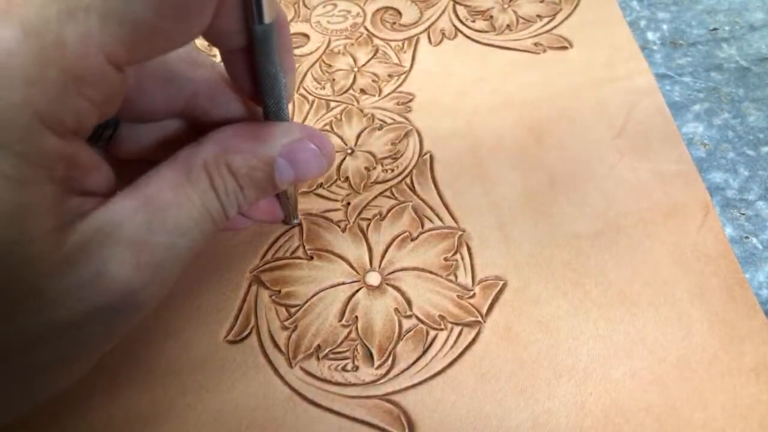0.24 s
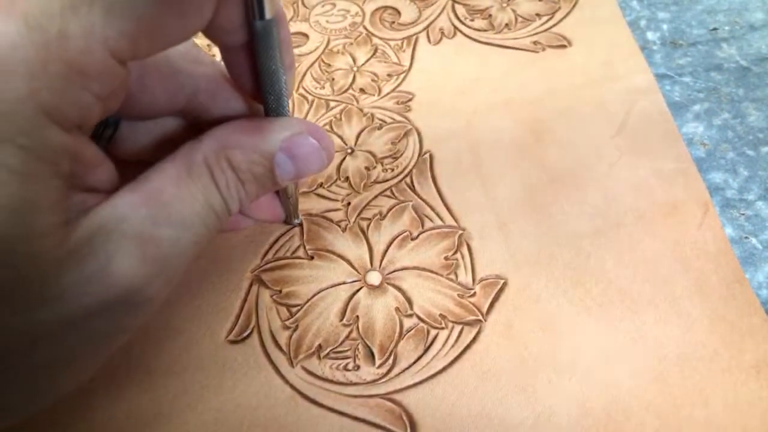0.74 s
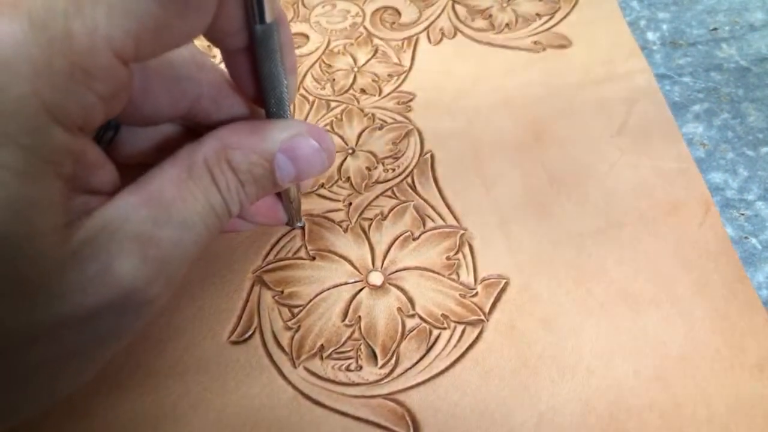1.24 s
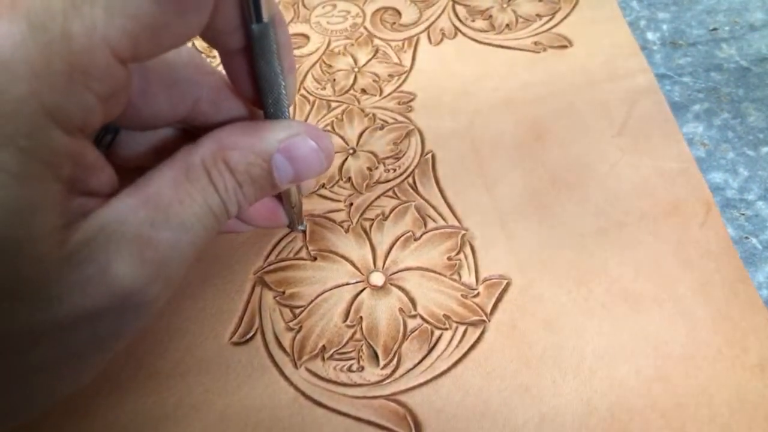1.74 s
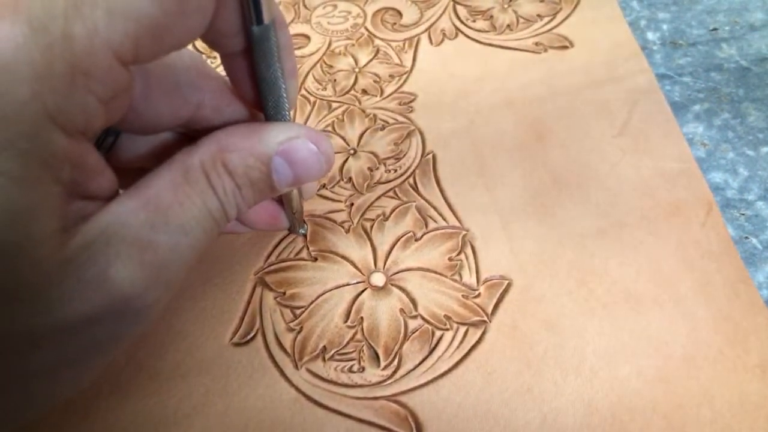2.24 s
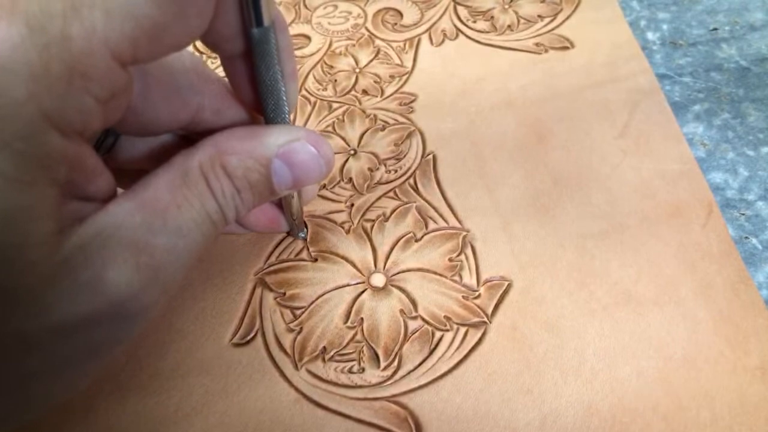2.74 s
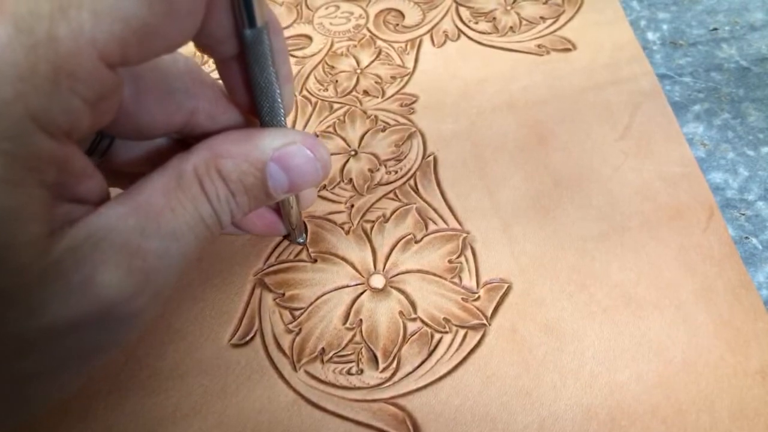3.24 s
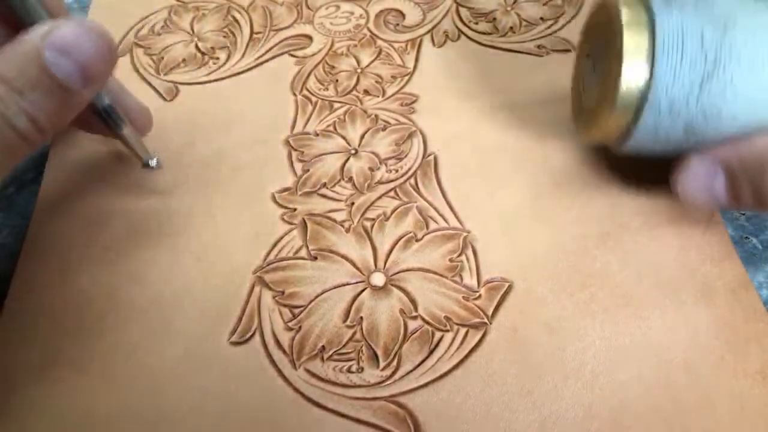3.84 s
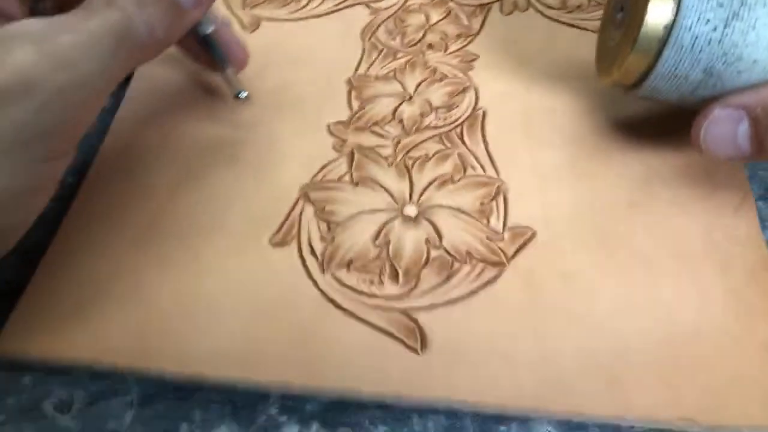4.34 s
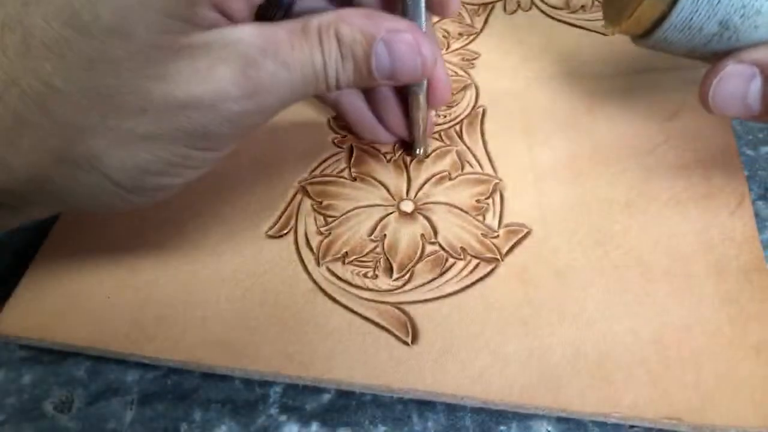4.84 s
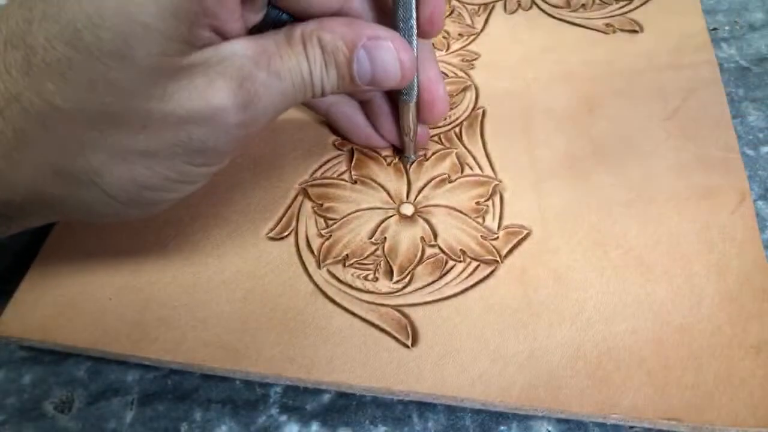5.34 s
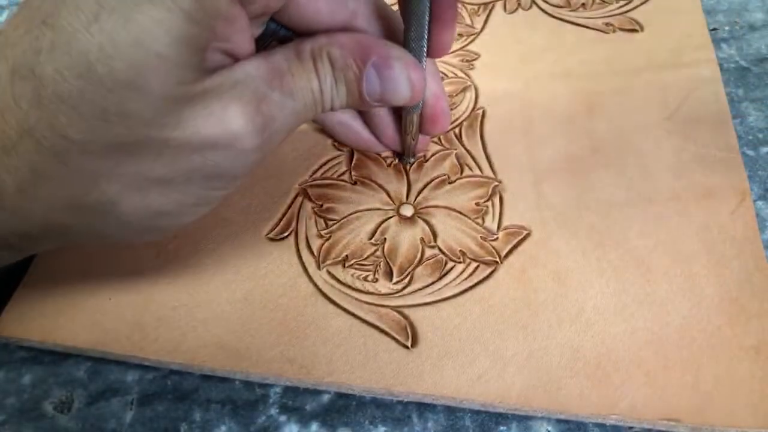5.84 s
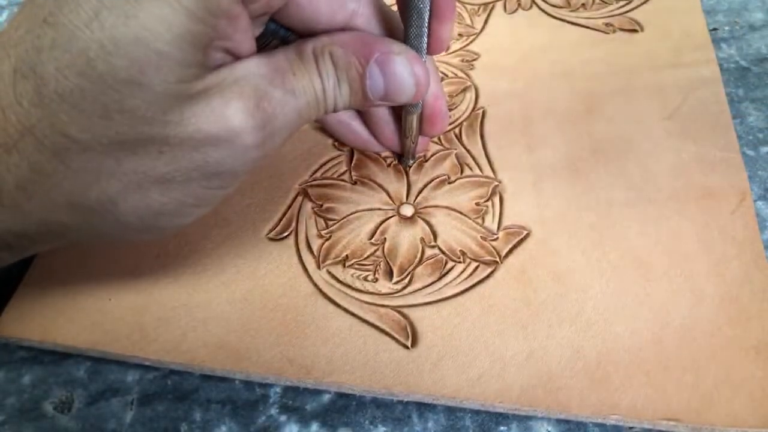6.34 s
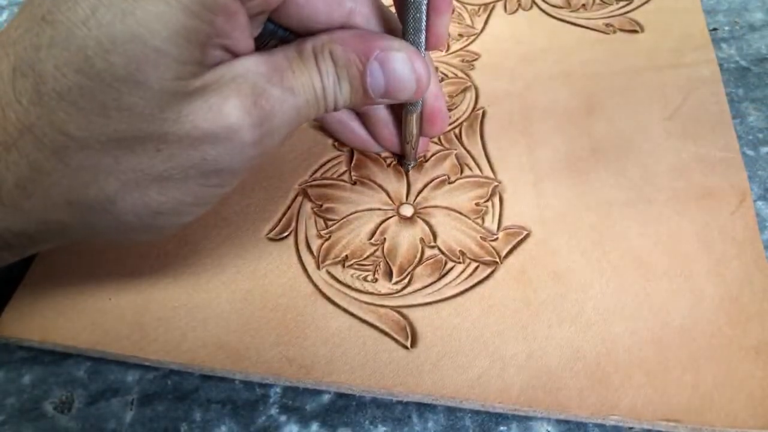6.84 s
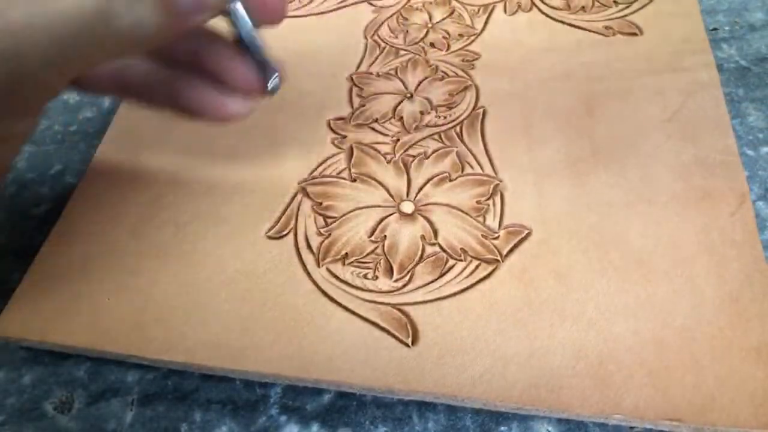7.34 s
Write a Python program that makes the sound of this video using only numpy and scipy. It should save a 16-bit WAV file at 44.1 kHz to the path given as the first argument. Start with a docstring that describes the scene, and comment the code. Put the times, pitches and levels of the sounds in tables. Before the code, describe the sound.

A mallet taps a steel stamp into leather on a stone slab in two quick runs, with faint handling between them.

```python
"""A mallet taps a steel stamp into leather on a stone slab, in two quick runs in a small workshop.
Each tap is a hard clack with a short clink of steel on top and a slab thud that sets the bench ringing.
Stronger blows sound brighter; the second run uses another stamp, with less knock and a deeper thud.
Between the runs tools touch down and a hand slides and turns the leather; one more slide ends the scene.
Under it all lies a faint bed of room air and motor hum."""
import sys
import numpy as np
from scipy import signal
from scipy.fft import rfft, irfft, next_fast_len
from scipy.io import wavfile

SR = 44100
rng = np.random.default_rng(int(sys.argv[2]) if len(sys.argv) > 2 else 0)


def persist_wave(psi):
    """Save psi, clipped to +-1, as 16-bit WAV."""
    counts = np.round(np.clip(psi, -1, 1) * 32767).astype(np.int16)
    wavfile.write(sys.argv[1], SR, np.atleast_2d(counts).T)


N = 334278
TIME = np.arange(N) / SR

# spectral shape of the room air: f/Hz, level/dB
AIR_COLOUR = [(15, -80), (25, -47), (53, -12.5), (84, -11.5), (117, -7), (180, -15), (229, -15),
              (263, -17.5), (285, -21.5), (405, -23), (451, -28.5), (624, -29.5), (2050, -41),
              (10700, -47.5), (16000, -50.5)]
# mallet taps: t/s, force/dB, hardness/dB, low and high bending pitch of the stamp f/Hz
TAPS = [(0.2281, -6.5, 0, 2094, 3840), (0.48, -1, 2, 2073, 3920), (0.7364, 1.5, 5, 2270, 4800),
        (1.0103, 0.5, -0.5, 2850, 4080), (1.255, 4, 1.5, 2450, 3200), (1.4877, 3, 2, 2670, 4800),
        (1.7144, 3, 2, 2544, 4900), (1.9436, 2, 0.5, 2617, 3600), (2.1647, 0.5, -3.5, 2290, 3760),
        (2.3837, -5.5, -6.5, 2216, 4020), (2.5776, -10.5, -9, 2245, 3700), (2.7726, -11.5, 0.5, 2053, 3940),
        (2.9572, -16.5, 0, 2084, 4100), (3.128, -23.5, 1.5, 2210, 3890), (3.2969, -24, 3, 2560, 3800),
        (5.7845, -6.5, -5.5, 1580, 4240), (6.0194, 1.5, 4, 2780, 4080), (6.2765, -3, 0.5, 2746, 4100),
        (6.509, -7, 0.5, 2334, 4330), (6.7034, -10.5, 1.5, 2154, 4050), (6.8928, -15.5, 0.5, 1914, 4300)]
# centres of a tap's five registers (thud, knock, clack, ring, snap): f/Hz
REGISTERS_HZ = [400, 1050, 2100, 4400, 8500]
# damped modes of mallet and hand-held stamp, grouped from knock to snap: f/Hz, width/Hz, level/dB
TOOL_MODES = [
    [(1057, 440, 1.5)],
    [(1851, 320, -3.5), (2364, 600, -4)],
    [(3050, 520, -4.5), (3778, 440, -3.5), (4760, 700, -9)],
    [(6325, 1300, -2.5), (8690, 1700, -5.5), (12500, 4500, -10)],
]
# lingering resonances of tools and slab, grouped likewise: f/Hz, width/Hz, level/dB, t60/s
AFTER_RING_MODES = [
    [(647.5, 21, -16.5, 0.26), (1200, 110, -15, 0.22)],
    [(1880, 140, -22.5, .2), (2250, 230, -18.5, 0.29)],
    [(3845, 380, -16, 0.23)],
    [(5440, 1400, -11, 0.22), (8600, 790, -20.5, 0.15)],
]
# spectral shape of the slab's thud: f/Hz, level/dB
THUD_COLOUR = [(40, -40.5), (70, -9), (110, -5), (190, -5), (310, -3), (490, -8), (600, -22), (900, -35),
               (2500, -91.5)]
# room reverb by half octave, relative to the tap: f/Hz, level/dB, t60/s
ROOM_TAIL = [(70, -19, 0.16), (171, -19.5, 0.58), (253.3, -11, 0.58), (340, -7, .45), (444, -13, 0.29),
             (690, -14.5, 0.25), (940, -14.5, 0.24), (1300, -16.5, 0.32), (2370, -16.3, 0.24),
             (3700, -13, 0.36), (5300, -19, 0.1), (8240, -17.5, .22), (15000, -27, 0.21)]
# modes of bench and slab: f/Hz, level/dB, t60/s
BENCH_MODES = [(74, -14.5, 0.46), (115, -19.5, 0.29), (157.5, -20.5, 0.55), (230, -25, 0.56),
               (246.4, -19.5, .42), (281.7, -20, .45), (299.6, -17, 0.57), (327, -15, .42), (368, -15, .45),
               (481, -16, 0.17)]
# early reflections of the thud: delay/s, level/dB
THUD_ECHOES = [(.0095, -14), (0.0181, -14)]
# light touches of the tools: t/s, level/dB
TOUCHES = [(3.445, -66), (3.745, -62.5), (3.963, -63.5), (4.389, -54), (4.956, -72)]
# spectral shape of a touch: f/Hz, level/dB
TOUCH_COLOUR = [(200, 16), (500, 11.5), (800, 1.5), (1250, 1.5), (1700, 2), (2600, -10), (5500, -14),
                (8500, -3.5), (15000, -30)]
# slides of hand and leather: full speed at t/s, hold/s, level/dB, scrape f/Hz
SLIDES = [(3.74, 0.028, -65.5, 1717), (4.175, 0.13, -67.5, 1722), (4.63, .11, -75, 1220),
          (7.27, .08, -67.5, 1220)]
# spectral shape of the rubbing: f/Hz, level/dB
SLIDE_COLOUR = [(300, 8), (750, 1), (1500, -0.5), (2000, -3.5), (3500, -6), (7000, -9), (10000, -14),
                (16000, -25)]
# resonances excited by the rubbing: f/Hz, width/Hz, level/dB
SLIDE_MODES = [(1220, 55, -17), (1720, 80, -18), (2390, 230, -17), (3440, 240, -14.5), (4470, 290, -14.5)]

# each stamp's voice at force and hardness 0: knock, clack, ring, snap level/dB
FIRST_STAMP, SECOND_STAMP = (-31, -28.5, -39, -49.5), (-44, -32, -36.5, -47.8)
STAMP_CHANGE_S = 4.5
# a stronger or harder blow is shorter and so brighter: knock, clack, ring, snap slope/(dB per dB)
PER_FORCE, PER_HARDNESS = (.24, .46, .61, .96), (.1, .36, 1, 1.15)


def from_db(db):
    """Decibels to gain."""
    return 10 ** (np.asarray(db) / 20)


def unit_rms(x):
    """Scale to rms 1."""
    return x / np.sqrt(np.mean(x ** 2) + 1e-20)


def unit_hit(x):
    """Scale a short sound to the energy of 10 ms at rms 1."""
    return x / np.sqrt(np.sum(x ** 2) / (SR / 100) + 1e-20)


def at_hz(table, hz, column=1):
    """Read a column of a table on a log-frequency axis."""
    table = np.array(table)
    return np.interp(np.log(hz), np.log(table[:, 0]), table[:, column])


def band(x, hz, width_hz, order=2):
    """A flat-topped resonance."""
    edges = np.clip([hz - width_hz / 2, hz + width_hz / 2], 10, .48 * SR)
    return signal.sosfilt(signal.butter(order, edges, "band", fs=SR, output="sos"), x + 1e-18)


def add(out, s, sound):
    """Mix a sound in at time s."""
    i = max(0, round(s * SR))
    out[i:i + len(sound)] += sound[:max(0, len(out) - i)]


def coloured_noise(colour):
    """Noise with a given spectral shape, rms 1."""
    size = next_fast_len(N)
    hz = np.maximum(np.fft.rfftfreq(size, 1 / SR), 1)
    spectrum = rfft(rng.standard_normal(size)) * from_db(at_hz(colour, hz))
    return unit_rms(irfft(spectrum, size)[:N])


def band_noise(hz, width_hz, order=2):
    """Noise in one band, rms 1."""
    return unit_rms(band(rng.standard_normal(N), hz, width_hz, order))


def drift(per_s):
    """A random wobble, rms 1."""
    knots = np.arange(0, N / SR + 1, 1 / per_s)
    return unit_rms(np.interp(TIME, knots, rng.standard_normal(len(knots))))


def lingering(hz, width_hz, t60):
    """A resonance carried on by the room: a grainy, dying ring."""
    t = TIME[:SR // 3]
    settled = band(rng.standard_normal(2 * len(t)), hz, width_hz)[len(t):]
    return unit_hit(settled * from_db(-60 * t / t60))


def room_tone(air_db=-63.5, hum_hz=119.2, hum_db=-72, waver_db=3):
    """The bed: low air noise and a wavering motor hum."""
    hum = np.sqrt(2) * np.sin(2 * np.pi * hum_hz * TIME) * from_db(hum_db + waver_db * drift(7))
    return from_db(air_db) * coloured_noise(AIR_COLOUR) + hum


def strikes(base_thud_db=-30, base_send_db=-.5, send_per_force=.07):
    """Cue each tap: t/s, thud level/dB, knock-to-snap levels/dB, clink pitches/Hz, room send/dB."""
    for s, force_db, hardness_db, *clink_hz in TAPS:
        voice_db = np.array(FIRST_STAMP if s < STAMP_CHANGE_S else SECOND_STAMP)
        tool_db = voice_db + force_db * np.array(PER_FORCE) + hardness_db * np.array(PER_HARDNESS)
        send_db = base_send_db + send_per_force * force_db   # strong blows fill the room more
        yield s, base_thud_db + force_db, tool_db, clink_hz, send_db


def steel_clink(db=-5, t60=0.028, rise_s=0.00033, lead_s=0.0022, tail_db=-16):
    """The grip lets two bending modes of the steel sing briefly; their pitches linger faintly."""
    out, t = np.zeros(N), TIME[:SR // 20]
    envelope = (1 - np.exp(-t / rise_s)) ** 2 * from_db(-60 * t / t60)
    for s, _, tool_db, clink_hz, send_db in strikes():
        for hz in clink_hz:
            register_db = np.interp(np.log(hz), np.log(REGISTERS_HZ[1:]), tool_db)
            ping = unit_hit(envelope * np.sin(2 * np.pi * hz * t))
            add(out, s - lead_s, from_db(register_db + db) * ping)
            tail = lingering(hz, width_hz=160, t60=0.19)
            add(out, s, from_db(register_db + send_db + tail_db) * tail)
    return out


def mallet_clack(contact_s=0.00084, chatter_hz=2200, grip_detune=0.039, spread_db=1.5, lag_s=0.00018):
    """The mallet lands and chatters on the steel, most in the treble; the grip detunes each tap."""
    out, t = np.zeros(N), TIME[:SR // 25]
    impact = len(t) // 5
    landing = unit_hit(signal.unit_impulse(len(t), impact))
    pressure = 1 / np.cosh((t - t[impact]) / contact_s)
    for s, _, tool_db, _, _ in strikes():
        for modes, register_db in zip(TOOL_MODES, tool_db):
            for hz, width_hz, mode_db in modes:
                chatter = (hz / chatter_hz) ** 2 * unit_hit(pressure * rng.standard_normal(len(t)))
                gripped_hz = hz * (1 + grip_detune * rng.uniform(-1, 1))
                ringing = unit_hit(band(landing + chatter, gripped_hz, width_hz, order=3))
                crest_s = np.average(t, weights=ringing ** 2)   # all modes crest together
                gain = from_db(register_db + mode_db + spread_db * rng.normal())
                add(out, s + lag_s - crest_s, gain * ringing)
    return out


def after_ring(spread_db=1.5):
    """Tools and slab leave a faint, diffuse ring, a little different every time."""
    out = np.zeros(N)
    for s, _, tool_db, _, send_db in strikes():
        for modes, register_db in zip(AFTER_RING_MODES, tool_db):
            for hz, width_hz, mode_db, t60 in modes:
                gain = from_db(register_db + send_db + mode_db + spread_db * rng.normal())
                add(out, s, gain * lingering(hz, width_hz, t60))
    return out


def slab_thud(late_cycles=1.15, lag_s=.0002, second_pitch=0.89):
    """The leather cushions the blow; the slab thuds with its lows arriving last, so the pitch falls."""
    out = np.zeros(N)
    hz = np.maximum(np.fft.rfftfreq(8192, 1 / SR), 1)
    down_sweep = np.exp(-2j * np.pi * late_cycles * np.log(hz))
    for s, thud_db, *_ in strikes():
        pitch = 1 if s < STAMP_CHANGE_S else second_pitch   # the second stamp sinks in more slowly
        thud = irfft(from_db(at_hz(THUD_COLOUR, hz / pitch)) * down_sweep)
        add(out, s + lag_s, from_db(thud_db) * unit_hit(thud[:SR // 10]))
    return out


def workshop_reverb(build_s=0.0011, near_db=3, near_t60=0.12):
    """Each tap washes into the room: quick returns off hands and bench, then a tail dying band by band."""
    out, t = np.zeros(N), TIME[:SR * 2 // 3]
    near = from_db(near_db - 60 * t / near_t60)
    edges_hz = 50 * 2 ** (np.arange(18) / 2)   # half octaves
    for low, high in zip(edges_hz, edges_hz[1:]):
        hz = (low + high) / 2
        attack = 1 - np.exp(-t / (build_s + 2 / hz))
        tail = from_db(-60 * t / at_hz(ROOM_TAIL, hz, column=2))
        envelope = unit_hit(attack * np.hypot(tail, near))
        power = np.zeros(N)
        for s, thud_db, tool_db, _, send_db in strikes():
            register_db = np.interp(np.log(hz), np.log(REGISTERS_HZ), [thud_db, *tool_db])
            add(power, s, (from_db(register_db + send_db) * envelope) ** 2)
        out += from_db(at_hz(ROOM_TAIL, hz)) * np.sqrt(power) * band_noise(hz, high - low, order=3)
    return out


def bench_ring(swell_s=0.0053, spread_db=3.5, lag_s=.003):
    """The bench takes up each thud over a few cycles and rings on."""
    out, t = np.zeros(N), TIME[:SR * 2 // 3]
    swell = 1 - np.exp(-t / swell_s)
    modes = np.array([(-1) ** k * swell * from_db(db - 60 * t / t60) * np.sin(2 * np.pi * hz * t)
                      for k, (hz, db, t60) in enumerate(BENCH_MODES)])
    for s, thud_db, *_ in strikes():
        gains = from_db(thud_db + spread_db * rng.standard_normal(len(modes)))
        add(out, s + lag_s, gains @ modes)
    return out


def thud_echoes(thuds):
    """The thud bounces back from the bench top and a wall."""
    out = np.zeros(N)
    for delay_s, db in THUD_ECHOES:
        add(out, delay_s, from_db(db) * thuds)
    return out


def tool_touches(t60=0.0536):
    """A tool touches down with a soft, dull tick."""
    out, t = np.zeros(N), TIME[:SR // 8]
    noise = coloured_noise(TOUCH_COLOUR)
    for s, db in TOUCHES:
        tick = noise[round(s * SR):][:len(t)] * from_db(-60 * t / t60)
        add(out, s, from_db(db) * unit_hit(tick))
    return out


def leather_slides(rough_db=1.5, scrape_db=-11.5, rise_db_per_s=100, fall_db_per_s=125):
    """Skin and leather rub with an uneven grain, each stroke swelling, holding and fading."""
    out = np.zeros(N)
    resonances = sum(from_db(db) * band_noise(hz, width_hz) for hz, width_hz, db in SLIDE_MODES)
    rubbing = coloured_noise(SLIDE_COLOUR) + resonances
    grain_db = rough_db * drift(per_s=110)
    for s, hold_s, db, scrape_hz in SLIDES:
        fade_in_db = rise_db_per_s * np.maximum(s - TIME, 0)
        fade_out_db = fall_db_per_s * np.maximum(TIME - s - hold_s, 0)
        scrape = from_db(scrape_db) * band_noise(scrape_hz, width_hz=70)
        out += (rubbing + scrape) * from_db(db + grain_db - fade_in_db - fade_out_db)
    return out


def scene():
    """The mono mix: taps up front, their room behind, quiet handling and room tone underneath."""
    thuds = slab_thud()
    taps = mallet_clack() + steel_clink() + after_ring() + thuds + thud_echoes(thuds) + bench_ring()
    return (taps + workshop_reverb() + leather_slides() + tool_touches() + room_tone())[None]


def record(dry, low_cut_hz=56, high_cut_hz=15800):
    """The microphone drops the deep bass; a steep filter trims the very top."""
    low_cut = signal.butter(4, low_cut_hz, "high", fs=SR, output="sos")
    high_cut = signal.ellip(10, .2, 80, high_cut_hz, fs=SR, output="sos")
    return signal.sosfilt(high_cut, signal.sosfilt(low_cut, dry))


dry = scene()
out = record(dry)
persist_wave(out)
```